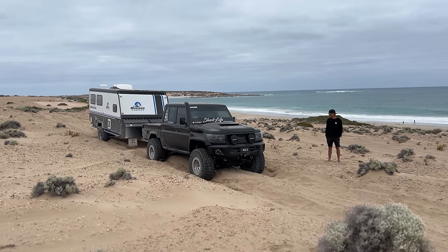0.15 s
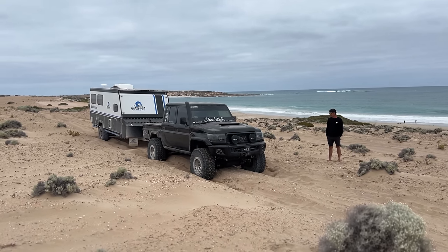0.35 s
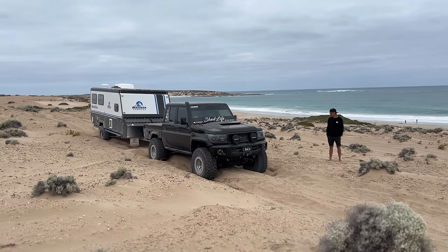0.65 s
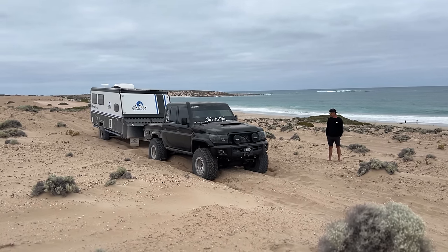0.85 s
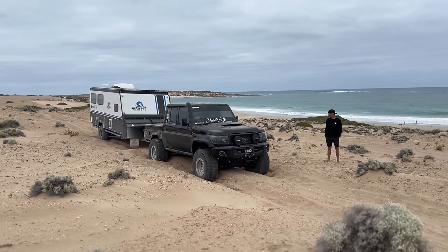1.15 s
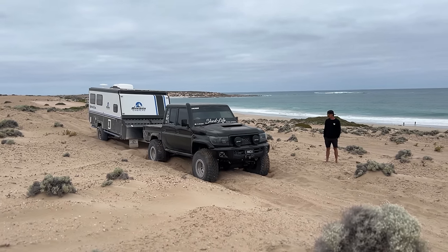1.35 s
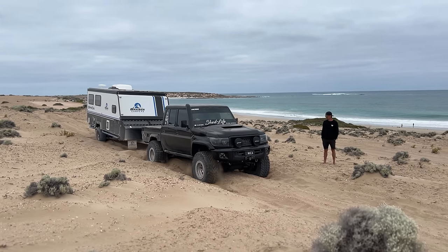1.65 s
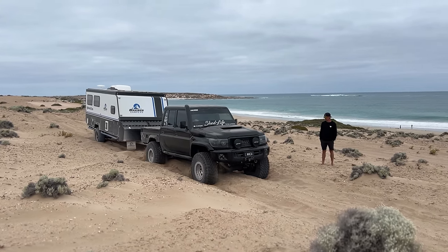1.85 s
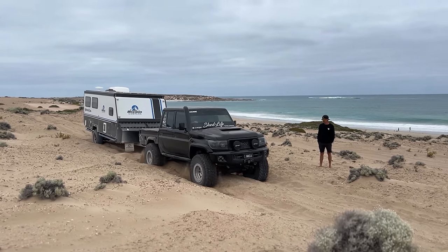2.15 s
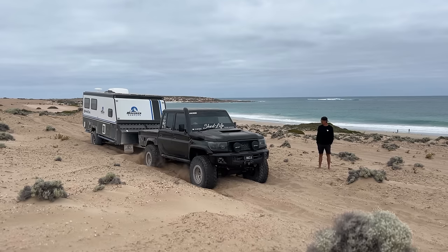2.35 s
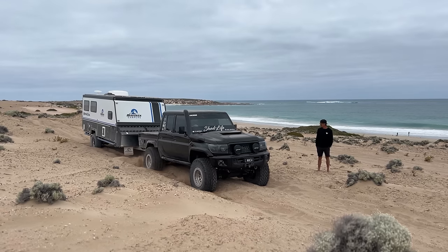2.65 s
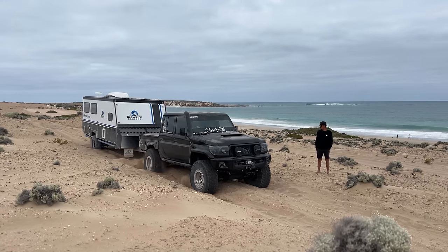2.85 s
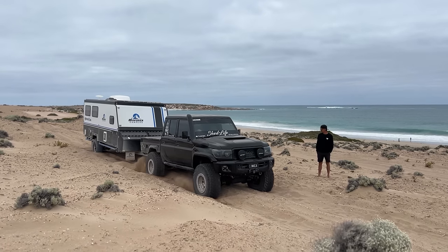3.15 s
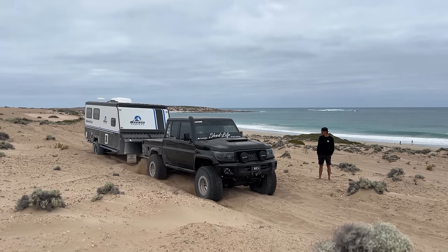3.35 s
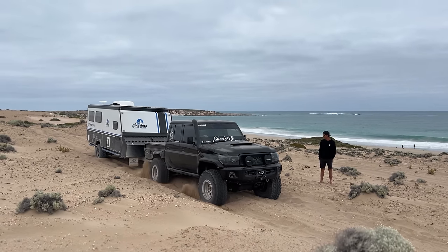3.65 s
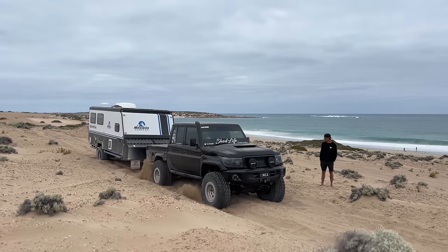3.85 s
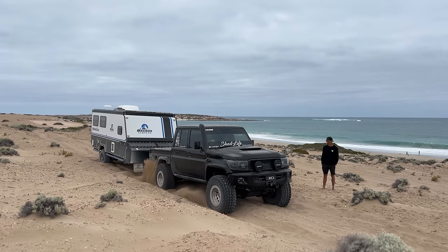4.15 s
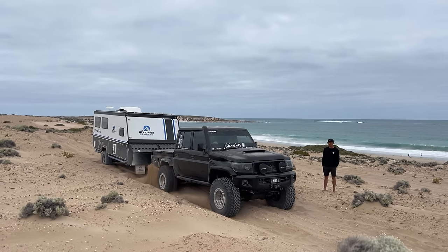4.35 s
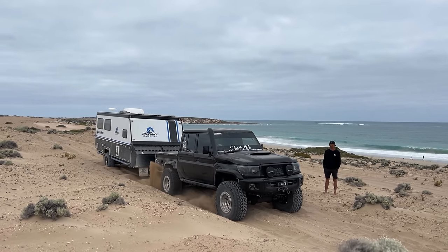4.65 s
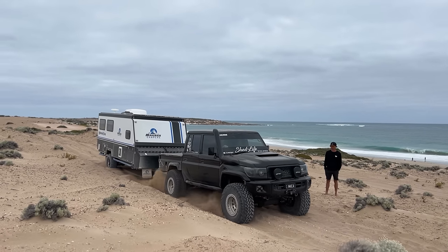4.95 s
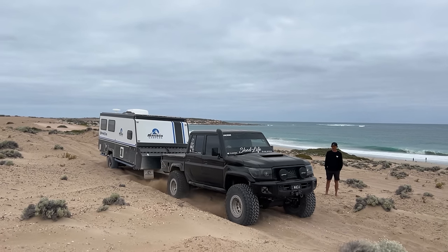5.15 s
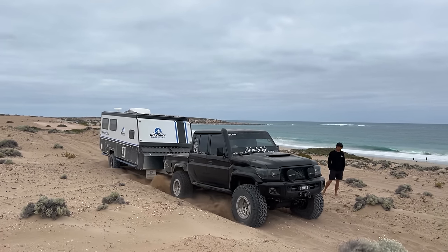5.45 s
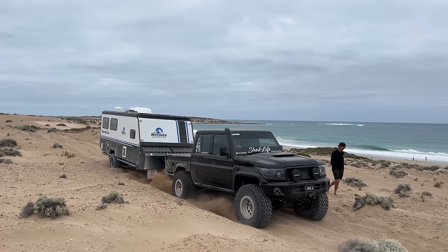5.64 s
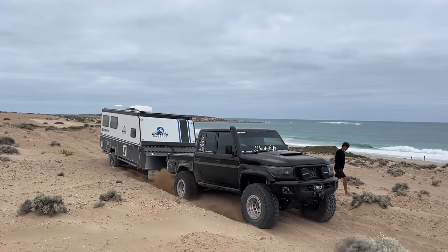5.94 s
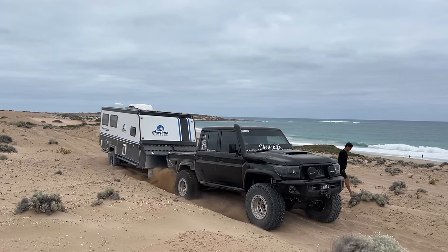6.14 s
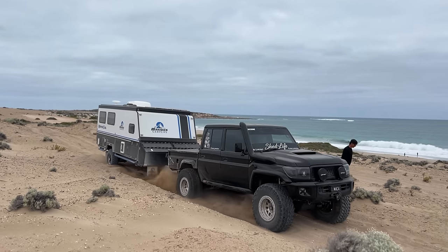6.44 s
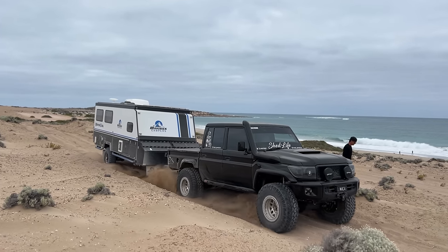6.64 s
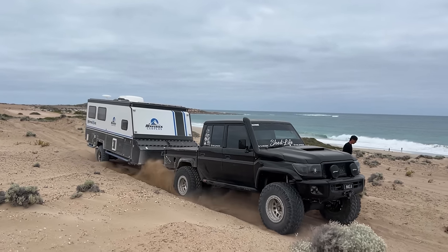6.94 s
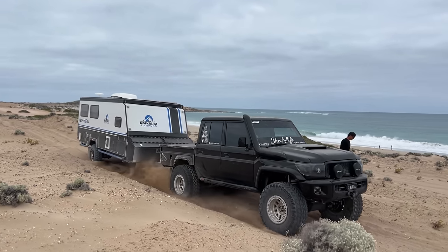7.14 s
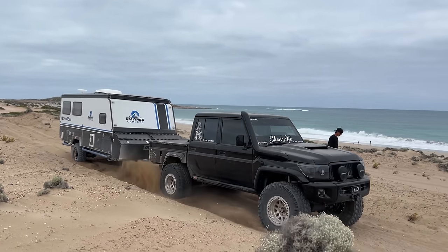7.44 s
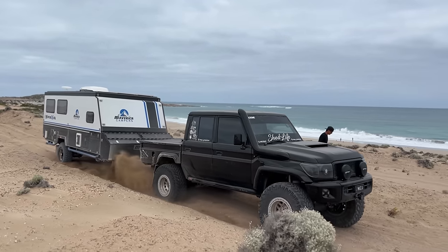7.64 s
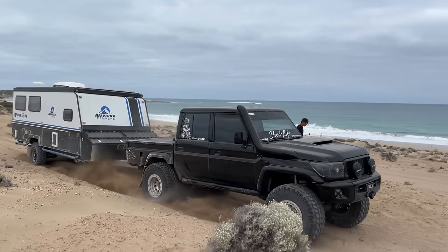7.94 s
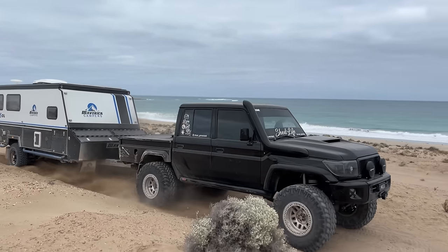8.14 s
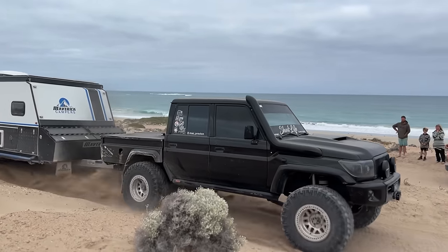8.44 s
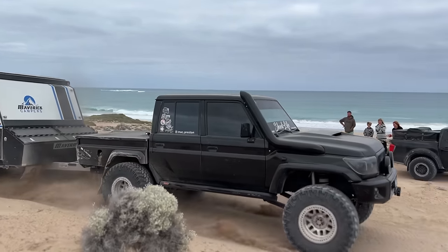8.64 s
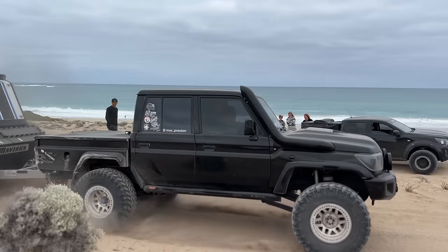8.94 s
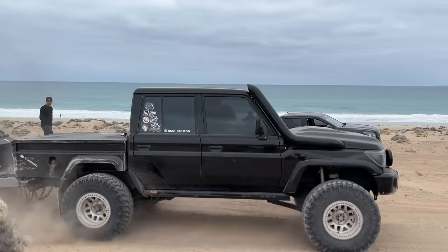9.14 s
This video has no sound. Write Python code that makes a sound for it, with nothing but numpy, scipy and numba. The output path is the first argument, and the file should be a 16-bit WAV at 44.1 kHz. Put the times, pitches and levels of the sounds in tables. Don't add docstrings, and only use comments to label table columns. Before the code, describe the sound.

A big turbo-diesel truck towing a caravan through soft sand, heard on a handheld phone in open sea wind. Low wind thumps and thin air hiss come first, a rising whistle next, then a lumpy exhaust roar. The pitch sags under load, climbs to a hard peak near seven seconds, drops and surges again, closer and raspier with crackling pops, before the throttle closes and the roar falls away.

```python
import sys
import numpy as np
from scipy import signal
from scipy.fft import rfft, irfft, next_fast_len
from scipy.io import wavfile
from scipy.ndimage import uniform_filter1d
from numba import njit

SR = 44100
rng = np.random.default_rng(int(sys.argv[2]) if len(sys.argv) > 2 else 0)


def to_wav(s):
    ch = np.atleast_2d(s).T
    pcm = np.round(np.clip(ch, -1, 1) * 32767)
    wavfile.write(sys.argv[1], SR, pcm.astype(np.int16))


def level_to_linear(level):
    exponent = np.asarray(level, float) / 20
    return 10 ** exponent


N = 409688

# (time [s], level [dB])
BREEZE = [(0, -41.5), (.85, -25.5), (2, -24), (2.9, -24.5), (3.3, -23), (5.5, -27.5), (6.1, -24),
          (8.7, -26), (9.29, -36.5)]
# (time [s], peak [dB], half length [s])
GUSTS = [(0.025, -25, 0.02), (0.074, -34, 0.037), (0.15, -28, 0.087), (0.42, -28, 0.048),
         (0.483, -21.5, 0.014), (0.562, -24, 0.046), (0.651, -33, 0.013), (0.743, -25.5, 0.0091),
         (0.83, -35, 0.018), (0.893, -26.5, 0.0083), (1.665, -26.5, 0.034), (2.2, -25, 0.037),
         (3.5, -24.5, .07), (4.1, -25, 0.034), (5.081, -27, 0.017), (9.13, -40, 0.0044),
         (9.193, -37, 0.026)]
# (time [s], level [dB])
RUSH = [(0, -71), (.2, -63), (.5, -46), (.8, -60), (.88, -41), (.93, -46), (1.13, -47), (1.3, -82),
        (9.29, -78)]
# (time [s], extra way [ms], strength [0-1])
GROUND = [(0, 1.243, 0.9), (3, 1.22, 0.1), (5.8, 1.25, 0.24), (6.4, 1.13, 0.2), (7.2, 1.09, 0.8),
          (7.4, 1.83, 0.4), (9.29, 1.78, 0.2)]
# (frequency [Hz], far level [dB per Hz], near level [dB per Hz])
HISS = [(900, -17.5, -11), (2370, 0, 4.5), (4500, -4.5, 8), (5990, -19.5, -10), (7300, 6.5, 9.5),
        (7550, -6.5, -4), (9900, -3, -0.5), (11260, -10, 6), (12800, -20, -19), (14300, -36, -13),
        (15500, -29, -21)]
# (start [s], full [s], hold to [s], gone [s])
SURGES = [
    (.25, .6, 1.9, 2.7),
    (3.3, 3.55, 5, 5.3),
    (5.3, 5.75, 7.05, 7.25),
    (6.3, 6.5, 6.7, 7.0),
    (7.3, 7.9, 8.3, 8.95),
]
SURGE_DB = [4.75, 2.6, 3.9, 1.6, 4.3]
# (time [s], level [dB])
KNOCKS = [
    (0.024, 27),
    (9.124, 21.9),
]
# (frequency [Hz], width [Hz], level [dB])
HITCH_RINGS = [(120, 49, -0.5), (335, 31, 2), (430, 38, 3), (650, 230, -12)]
# (time [s], whistle [Hz], level [dB])
TURBO = [(.2, 4800, -80), (.3, 5700, -44), (.46, 7000, -42), (.62, 8900, -50), (.79, 10700, -42),
         (.87, 11900, -31), (.95, 13100, -38), (1.06, 14300, -43), (1.16, 15900, -55), (1.6, 15000, -56),
         (2.4, 14400, -60), (3, 14200, -80)]
# (time [s], rate [Hz])
SPEED = [(1.3, 20.54), (1.43, 21.49), (1.59, 22.16), (1.8, 23.32), (2.0, 23.87), (2.03, 23.6), (2.1, 22.09),
         (2.13, 21.84), (2.47, 21.99), (2.56, 21.88), (2.75, 20.55), (2.83, 20.2), (2.95, 19.97),
         (3.15, 19.79), (3.46, 20.09), (3.68, 18.87), (3.77, 18.55), (3.94, 18.42), (4.32, 18.94),
         (4.8, 20.38), (4.88, 20.73), (4.91, 20.62), (5.18, 18.34), (5.23, 18.03), (5.26, 18.0),
         (5.51, 18.43), (5.78, 19.81), (5.97, 21.61), (6.26, 23.91), (6.36, 25.14), (6.46, 26.63),
         (6.59, 28.31), (6.75, 30.0), (6.93, 31.36), (7.03, 31.75), (7.14, 32.64), (7.19, 32.6),
         (7.22, 32.22), (7.33, 28.6), (7.39, 27.15), (7.42, 26.81), (7.48, 26.76), (7.61, 27.32),
         (7.75, 28.61), (7.87, 29.12), (7.9, 28.91), (7.99, 27.7), (8.08, 26.75), (8.18, 25.37),
         (8.25, 24.71), (8.3, 24.64), (8.41, 24.84), (8.61, 23.58), (8.67, 23.54), (8.75, 23.75),
         (8.84, 23.3)]
# (time [s], level [dB])
EFFORT = [(1.12, -25), (1.33, -6.5), (1.8, -7.5), (2, -8.5), (2.15, -6.5), (2.62, -7.5), (2.76, -9.5),
          (3.5, -8), (4.2, -5.5), (4.9, -4.5), (5.3, -9.5), (5.7, -6.5), (6.3, -6.5), (7.1, -10.5),
          (7.25, -12.5), (7.45, -13), (8.8, -8), (8.87, -15), (9.0, -25), (9.29, -28)]
# (time [s], level [dB])
THROTTLE = [(0, -20), (.2, -10), (.45, -4.5), (.9, 2.5), (2.07, 3), (2.17, 9), (2.35, 4), (4.11, -2),
            (4.94, 2.5), (5.33, -4.5), (6.21, 11), (6.44, 5), (7.12, 8), (7.2, -4.5), (7.3, 2.5),
            (7.4, 5.5), (7.92, 10), (8.77, 8), (8.93, -10.5), (9.29, -18)]
BITE_S = (1.0, 1.3)
# (strength [dB], lateness [firing slots], crack [dB])
CYLINDERS = [(6, 0.0373, 1), (3.5, 0.1033, -15), (3.5, -0.121, -0.5), (3, -0.0335, -1.5),
             (-7.5, 0.11, -2.5), (5.5, 0.0628, -6.5), (0.5, -0.0574, -1.5), (-5.5, 0.12, 1.5)]
# (frequency [Hz], width [Hz], level
# [dB])
BOOM = [(60.3, 21, -0.5), (109, 61, 1.5), (132, 43, -7.5), (193.3, 9.4, 3.5), (267.7, 23, 4.5),
        (288, 67, -14.5)]
BARK = [(352, 66, -1), (434, 29, -0.5), (492, 44, -2), (533, 74, 1.5), (672, 31, -5.5), (721, 11, 5),
        (863, 18, -4.5)]
GAS = [(1060, 193, 6.5), (1455, 91, 9), (1575, 236, 11.5), (2022, 100, 1.5), (2298, 140, -2.5),
       (2950, 110, -7), (3280, 180, -1.5), (3850, 250, -2.5), (4600, 240, -40), (6100, 200, -24)]
# (frequency [Hz], width [Hz], level [dB])
GAS_NEAR = [(1061, 93, 9.5), (1364, 180, 2), (1642, 56, 5.5), (1960, 174, 5.5), (2320, 50, 10),
            (2630, 530, -4.5), (3337, 220, -1.5), (3920, 570, -28), (4300, 460, -15)]
# (time [s], share [0-1], bright ridge [Hz], rasp band [Hz])
NEAR = [(0, 0.014, 3920, 2320), (5, 0.02, 4000, 2300), (5.8, 0.19, 3800, 2370), (6.35, 0.42, 4600, 2320),
        (6.7, 0.42, 4500, 2740), (7.1, 0.54, 4800, 2630), (8.1, 0.6, 4600, 2730), (8.8, 0.49, 4500, 2680),
        (9.29, 0.36, 4300, 3080)]
MULTIPLE_DB = [-8.5, -32, -7.0, -24.5, -20, -17.5, -31.5, -32, -28, -37.5, -20.5, -32.5, -27.5, -23.0,
               -28.5, -25.5, -40.5, -28, -31.5, -32.5, -34, -34.5, -36, -38.5, -34, -29, -36.5, -35, -34.5,
               -30, -34.5, -36, -29.5, -33, -27, -37.5, -43, -27, -32, -29, -22, -26.5, -16.5, -19, -13,
               -15.5, -21, -8, -12.5, -6, -3, -7, -5, -6.5, -2.5, -2]
# (frequency [Hz], width [Hz], then level [dB] at each turn of the truck)
PIPE = [(88.7, 52, -10, -22, -15, -9, -8, -11.5, -16, -27, -17),
        (111.9, 26.6, 3, 4, 8, -0.5, -24, -7.0, -2, -23, -32),
        (134, 38, -19, -43, -3, -33, 0, -6.5, -5, -1, -3),
        (178.4, 40, 7.5, 2.5, -4.0, -6, -9, -33, -12.5, 3, -4),
        (232.0, 36.6, 21.5, 16, 16.5, 12, 5, -49, -2, -15, 1),
        (249.5, 37.7, -10, 2, 3, -3, 11.5, 17, 5, 13, -23),
        (290.4, 77, -31.0, -39, -46, -43, -51, 2, -14, 12, 15.5),
        (369, 61.6, 5.5, 11, 5, 0.5, 8.5, 3.5, 7, -8, -17),
        (425.5, 41, 1.5, 3, 1.5, -25, -12, 14, -3, 9, 6),
        (464.5, 115, -20, 4, 5.5, 2, 6.5, 2.5, 8.5, 9.5, -1),
        (561.6, 85, 8.5, 8.5, -3.5, -2, -5, 14, 4.5, 4.5, 16),
        (672.6, 65, -1, -2, -4, -2, -3, 8, 3.5, 11.5, 6),
        (739, 17, -5, 4, 6.5, -11, -38.5, -2.0, -31, 17, 9),
        (830.0, 142, -12.5, -15, -32, -43.0, -66, -23, -0.5, 9, -2.0),
        (1008, 98, -59, -45, -56, -60.0, -54, -8, 9.5, 1, -34),
        (1087, 120, -58, -45, -31, -43, -33, -58.0, -57.5, 1, -15)]
TURN_S = (1.5, 2.4, 3.2, 4.1, 5.3, 6.2, 6.9, 7.7, 8.6)
# (first [s], last [s], first level [dB], last level [dB])
BURSTS = [(0.025, .024, -33, -23), (0.735, .736, -31, -24), (1.3068, 1.355, -16, -13.5),
          (1.79, 1.788, -16.5, -20), (1.849, 1.8465, -22, -17), (2.1414, 2.1956, -25, -10.5),
          (2.562, 2.5607, -28, -20), (2.6544, 2.7503, -13.5, -24), (2.8087, 2.8094, -29, -18),
          (2.899, 2.898, -26, -21), (2.9592, 2.9588, -18, -19), (3.492, 3.492, -29, -20),
          (4.383, 4.384, -36, -21), (4.801, 4.904, -18, -32), (5.8032, 5.9939, -17.5, -8.5),
          (6.04, 6.128, -9.5, -10), (6.1568, 6.1548, -14, -15), (6.1707, 6.2575, -10, -1.5),
          (6.299, 6.2982, -6, -11), (6.3312, 6.3317, -9.5, -11), (6.5945, 6.6295, -7, -13),
          (6.6618, 6.6988, -4.5, -10.5), (6.7927, 6.9592, -24, -20), (7.3799, 7.5289, -15, -22),
          (7.7093, 7.7455, -17, -12), (7.9192, 7.955, -17, -9.5), (8.1006, 8.178, -29, -8.5),
          (8.225, 8.3062, -6.5, -5), (8.4686, 8.5082, -10.5, -8.5), (8.6385, 8.7701, -8, -35),
          (9.1244, 9.1244, -47, -40)]
# (frequency [Hz], width [Hz], level [dB])
FRONT = [(1000, 900, 13)]
# (frequency [Hz], lead of the left [radians], likeness [0-1], left minus right [dB])
PORTS = [(30, 0, .97, -1.2), (400, .25, .97, -1.2), (750, .4, .9, -1), (1300, .1, .9, .8),
         (2100, .1, .9, -1.6), (3000, 1.2, .85, -.5), (4600, 1.3, .7, 1.8), (5500, 2.4, .1, .5),
         (6400, -.1, .7, 0), (8000, -.1, .65, 1), (8500, -1.2, .4, 0), (8950, -2.8, .9, 0),
         (9500, -3.14, 1, 0), (10500, -3.15, 1, 0), (11000, -3.8, .85, 0), (12200, -4.9, .75, 0),
         (12700, -6.1, 1, 0), (14200, -6.35, 1, 0), (14700, -7.3, .5, 0), (15400, -9.3, .5, 0)]

BOOM_DB, BARK_DB, GAS_DB, HISS_DB = -13.5, -20.5, -29.5, -40.5
BARK_PER_GAS, HISS_PER_GAS = 1, 0.065
STARVED_DB, STARVED_SLOPE = -6.5, 1.5
LIFT_OFF_DULLING = 0.18
REV_UP_HZ_PER_S, COAST_HZ_PER_S, FLYWHEEL_S = 8.1, 5.9, .06
SURF_DB, STRAY_DB = -64, -13
SPRAY_SWELL_DB, FLUTTER_DB, GUST_RUMBLE_DB = .9, -2, -0.5
SWAY_HZ = .7


def level(x, db):
    return x * level_to_linear(db) / np.sqrt(np.mean(x ** 2))


def steady(x, seconds):
    return x / np.sqrt(uniform_filter1d(x ** 2, int(seconds * SR)) + 1e-12)


def curves(table):
    s, *columns = np.transpose(table)
    return [np.interp(np.arange(N) / SR, s, c) for c in columns]


def walk(rate):
    k = int(SR / rate)
    steps = np.repeat(rng.standard_normal(N // k + 1), k)
    return 2.08 * uniform_filter1d(uniform_filter1d(steps, k), k)[:N]


def smooth_filter(x, order, hz, kind="low"):
    return signal.sosfilt(signal.butter(order, hz, kind, fs=SR, output="sos"), x)


@njit
def svf(x, hz, width):
    y, b, l = np.empty((2, len(x))), 0., 0.
    for i in range(len(x)):
        g, k = np.tan(np.pi * hz[i] / SR), width[i] / hz[i]
        v = (b + g * (x[i] - l)) / (1 + g * (g + k))
        y[0, i], y[1, i] = k * v, l + g * v
        b, l = 2 * v - b, l + 2 * g * v
    return y


def ring(x, modes):
    out = 0
    for k, (hz, width, db) in enumerate(modes):
        b, a = signal.iirpeak(hz, hz / width, SR)
        out = out + (-1) ** k * level_to_linear(db) * signal.lfilter(b, a, x)
    return out


def steep(x, modes):
    out = 0
    for hz, width, db in modes:
        b, a = signal.iirpeak(hz, hz / width, SR)
        out = out + level_to_linear(db) * signal.lfilter(np.convolve(b, b), np.convolve(a, a), x)
    return out


def decay(x, seconds):
    return signal.lfilter([1], [1, -np.exp(-1 / (seconds * SR))], x)


def stray(hiss_db):
    air = smooth_filter(rng.standard_normal((2, N)), 2, [2500, 14000], "band")
    air = smooth_filter(air, 4, [8900, 11100], "stop")
    return level(air, 0) * (level_to_linear(SURF_DB) + level_to_linear(hiss_db + STRAY_DB))


def wind():
    t = np.arange(N) / SR
    breeze = level_to_linear(curves(BREEZE)[0])
    gusts = sum(level_to_linear(db) * np.exp(-((t - s) / half) ** 2) for s, db, half in GUSTS)
    shared = signal.lfilter(*signal.iirpeak(85, .9, SR), rng.standard_normal(N))
    own = signal.lfilter(*signal.iirpeak(70, .9, SR), rng.standard_normal((2, N)))
    push = breeze * level_to_linear(3 * walk(25).clip(-3, 1.2)) + level_to_linear(GUST_RUMBLE_DB) * gusts
    thumps = smooth_filter(push * (level(shared, 1) + level(own, -7)), 2, 700)
    eddies = 1.53 * rng.standard_normal(N) + rng.standard_normal((2, N))
    flutter = smooth_filter(smooth_filter(eddies, 2, 280), 2, 1800)
    flutter_push = (level_to_linear(FLUTTER_DB) * breeze + gusts) * level_to_linear(0.65 * walk(60))
    return thumps + flutter_push * level(flutter, 5.2)


def rush():
    air = smooth_filter(rng.standard_normal(N), 3, [11000, 15300], "band")
    return level(air, 0) * level_to_linear(curves(RUSH)[0] + walk(12))


def hiss(db, puff, near):
    hz, far_db, near_db = np.transpose(HISS)
    out, shared, swell = 0, 1.1 * walk(9), SPRAY_SWELL_DB * walk(8)
    for f in 1000 * 2 ** np.arange(0, 4.1, 1 / 4):
        band = smooth_filter(rng.standard_normal(N), 2, [f / 1.09, f * 1.09], "band")
        far = np.interp(np.log(f), np.log(hz), far_db)
        close = np.interp(np.log(f), np.log(hz), near_db)
        colour_db = far + near * (close - far)
        flicker_db = shared + (f > 5500) * swell + 0.79 * walk(18)
        out = out + band * level_to_linear(colour_db + flicker_db)
    gated = out * (1 + 0.5 * puff / puff.mean())
    return level(gated, 1.7) * level_to_linear(db)


def ground(x):
    late_ms, share = curves(GROUND)
    dull = smooth_filter(x, 2, 5000)
    at = np.arange(N) - late_ms * SR / 1000
    return x + share.clip(0, 1) * np.interp(at, np.arange(N), dull)


def hitch():
    blow = np.zeros(N)
    for s, db in KNOCKS:
        blow[int(s * SR)] = level_to_linear(db)
    return ring(blow, HITCH_RINGS)


def turbo():
    hz, db = curves(TURBO)
    hz = np.clip(hz * (1 + 0.005 * walk(29.2)), 100, .45 * SR)
    breath = svf(rng.standard_normal(N), hz, .105 * hz)[0]
    breath = svf(breath, hz, .105 * hz)[0]
    return level_to_linear(db + 0.89 * walk(23.3)) * steady(breath, 0.23)


def tailpipe(jet, near, ridge_hz, rasp_hz):
    ridge = level_to_linear(-3.0) * svf(jet, ridge_hz, 0.047 * ridge_hz)[0]
    rasp = level_to_linear(6.5) * svf(jet, rasp_hz, 0.087 * rasp_hz)[0]
    return (1 - near) * steep(jet, GAS) + near * (steep(jet, GAS_NEAR) + ridge + rasp)


def cracks(cycle_hz, near, *bands_hz):
    turns = np.cumsum(cycle_hz) / SR
    fronts = np.zeros(N)
    for first, last, first_db, last_db in BURSTS:
        a, b = turns[int(first * SR)], turns[int(last * SR)]
        count = int(round(b - a)) + 1
        at = np.searchsorted(turns, np.linspace(a, b, count))
        fronts[at] = level_to_linear(np.linspace(first_db, last_db, count) + 4.0)
    neighbour = .6 * np.roll(fronts, int(.0102 * SR))
    sharp = fronts + neighbour
    pair = .6 * fronts + neighbour
    puff = decay(pair, .004)
    snap = steep(pair, [(850, 260, -1.0), (1620, 410, 2), (3280, 460, -14)])
    jet = 9 * pair + .4 * puff * rng.standard_normal(N)
    return tailpipe(jet, near, *bands_hz) + 2.5 * snap + ring(sharp, FRONT)


def firings(cycle_hz, jitter, scatter_db, crack_db):
    slots = np.cumsum(cycle_hz) * len(CYLINDERS) / SR
    count = np.arange(int(slots[-1]))
    strength, late, crack = np.array(CYLINDERS)[count % len(CYLINDERS)].T
    chance = rng.standard_normal((4000, 3))[count].T
    at = np.interp(count + late + jitter * chance[0], slots, np.arange(N - 0.)).clip(0, N - 2)
    i = at.astype(int)
    pulses, hard = np.zeros(N), np.zeros(N)
    size = level_to_linear(strength + scatter_db * chance[1])
    np.add.at(pulses, i, size * (1 - at + i))
    np.add.at(pulses, i + 1, size * (at - i))
    np.add.at(hard, i, level_to_linear(crack + crack_db * chance[2]))
    return pulses, hard


def exhaust(cycle_hz, boom_db, bark_db, gas_db, near, *bands_hz):
    pulses, hard = firings(cycle_hz, jitter=0.007, scatter_db=1.6, crack_db=4.2)
    pulses = level(pulses, 0)
    puff = decay(hard, 0.008)
    puffs = level(puff * rng.standard_normal(N), 0)
    boom = ring(pulses + 1.6 * smooth_filter(puffs, 2, 220), BOOM)
    bark = ring(pulses + .1 * puffs, BARK)
    bark = bark + near * ring(pulses, [(756, 130, 2.5), (1007, 140, 0.5)])
    jet = (.5 + .6 * near) * pulses + puffs + .3 * rng.standard_normal(N)
    gas = tailpipe(jet, near, *bands_hz)
    low = level_to_linear(boom_db - 4.0) * steady(boom, 0.22) + level_to_linear(bark_db - 7.5) * steady(bark, 0.079)
    return low + level_to_linear(gas_db - 6.5) * steady(gas, 0.68), puff


def tones(cycle_hz, effort_db, flow_db):
    step = 64
    coarse = np.arange(0, N, step)
    hz, width, *pose_db = np.transpose(PIPE)
    peak = level_to_linear(np.array([np.interp(coarse / SR, TURN_S, db) for db in np.transpose(pose_db)]))
    strength, late, _ = np.transpose(CYLINDERS)
    slots = (np.arange(len(late)) + late) / len(late)
    phase = 2 * np.pi * np.cumsum(cycle_hz) / SR
    dulling = LIFT_OFF_DULLING * np.clip(flow_db - 4, -10, 0) * (np.arange(N) > TURN_S[5] * SR)
    out = 0
    for k, db in enumerate(MULTIPLE_DB, 3):
        off = 2 * (k * cycle_hz[::step] - hz[:, None]) / width[:, None]
        gain = np.sum(peak / (1 + off ** 2) ** 1.6, axis=0)
        swing_db = dulling * max(k - 8, 0) + effort_db + 1.8 * walk(10)
        gain = np.interp(np.arange(N), coarse, gain * level_to_linear(db + swing_db[::step]))
        bank = np.angle(np.sum(level_to_linear(strength) * np.exp(-2j * np.pi * k * slots)))
        out = out + np.sqrt(2) * gain * np.cos(k * phase + bank)
    return out * np.interp(np.arange(N) / SR, BITE_S, [0, 1])


def ports(x):
    size = next_fast_len(N + SR)
    hz, lead, alike, pan_db = np.transpose(PORTS)
    f = np.arange(size // 2 + 1) * SR / size
    lead, alike, pan_db = (np.interp(f, hz, c) for c in (lead, np.clip(alike, 0, 1), pan_db))
    direct = rfft(x, size)
    tail = np.exp(-np.arange(2000) / (0.0073 * SR))
    scatter = rfft(rng.standard_normal((2, 2000)) * tail, size)
    scatter = direct * 1j * np.sqrt(2) * scatter.imag / (np.abs(scatter) + 1e-9)
    sway = 2 * np.pi * SWAY_HZ * np.arange(N) / SR + walk(3)
    out = []
    for side in (1, -1):
        port = np.exp(.5j * side * lead) * level_to_linear(side * pan_db / 2)
        a, b = irfft(np.sqrt((1 - alike) / 2) * scatter * port, size)[:, :N]
        straight = irfft(np.sqrt((1 + alike) / 2) * direct * port, size)[:N]
        out.append(straight + side * (a * np.cos(sway) + b * np.sin(sway)))
    return np.array(out)


def scene():
    t = np.arange(N) / SR
    cycle_hz = curves(SPEED)[0] - COAST_HZ_PER_S * np.maximum(t - SPEED[-1][0], 0)
    cycle_hz = cycle_hz - REV_UP_HZ_PER_S * np.maximum(SPEED[0][0] - t, 0)
    cycle_hz = uniform_filter1d(cycle_hz, int(FLYWHEEL_S * SR))
    effort_db = curves(EFFORT)[0]
    flow_db = curves(THROTTLE)[0]
    near, *bands_hz = curves(NEAR)
    near = near.clip(0, 1)
    bark_db = BARK_DB + effort_db + BARK_PER_GAS * np.maximum(flow_db, STARVED_DB)
    hiss_db = HISS_DB + HISS_PER_GAS * flow_db + STARVED_SLOPE * np.minimum(flow_db - STARVED_DB, 0)
    for times, db in zip(SURGES, SURGE_DB):
        hiss_db = hiss_db + db * np.interp(t, times, [0, 1, 1, 0])
    pipe, puff = exhaust(cycle_hz, BOOM_DB + effort_db, bark_db, GAS_DB + flow_db, near, *bands_hz)
    engine = tones(cycle_hz, effort_db, flow_db) + pipe + cracks(cycle_hz, near, *bands_hz)
    sand = ground(hiss(hiss_db - 0.9, puff, near))
    truck = engine + hitch() + sand + turbo() + rush()
    return ports(truck) + wind() + stray(hiss_db)


def top_cut(x):
    return signal.sosfilt(signal.butter(12, 15600, fs=SR, output="sos"), x)


def record(dry):
    thin = smooth_filter(dry, 4, 52, "high")
    rounded = np.tanh(0.95 * thin) / 0.93
    mix = smooth_filter(rounded, 2, 30, "high")
    return top_cut(mix)


dry = scene()
out = record(dry)
to_wav(out)
```